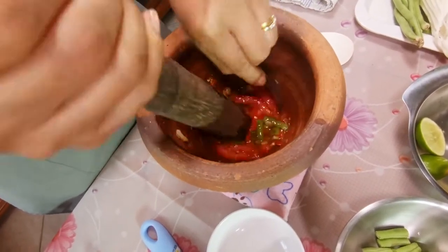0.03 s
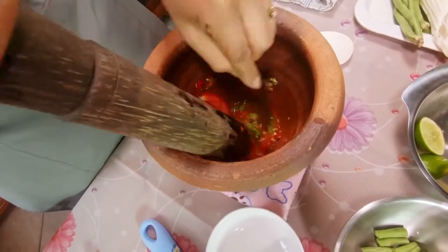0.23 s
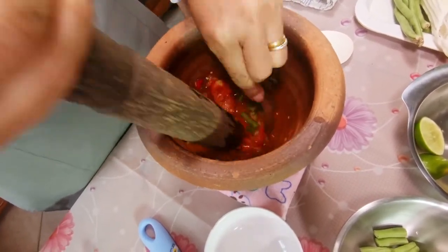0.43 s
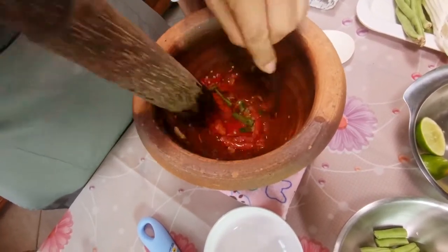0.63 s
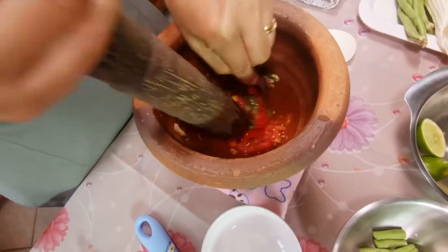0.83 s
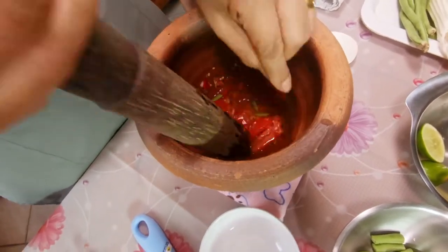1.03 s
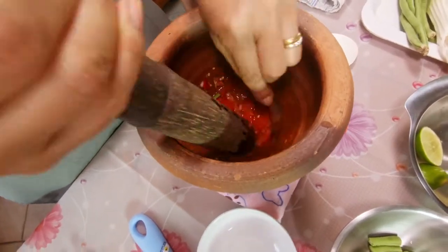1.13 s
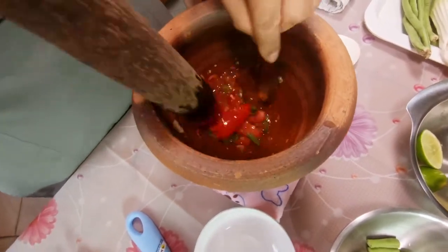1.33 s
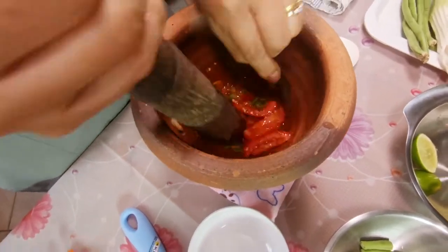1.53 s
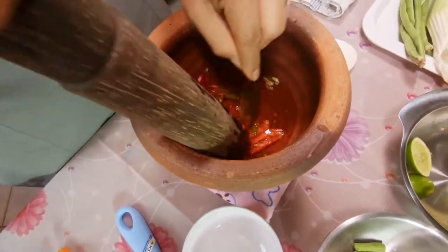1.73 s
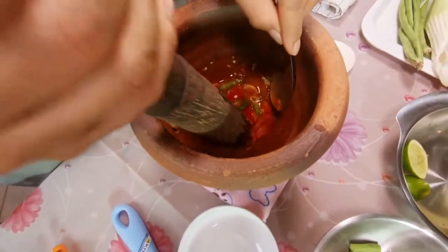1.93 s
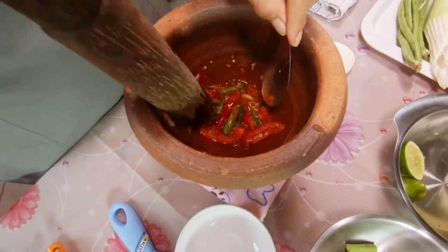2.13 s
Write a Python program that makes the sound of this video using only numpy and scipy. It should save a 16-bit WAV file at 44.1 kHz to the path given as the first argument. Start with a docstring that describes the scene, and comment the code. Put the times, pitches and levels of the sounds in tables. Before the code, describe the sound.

Hollow, uneven pestle knocks in a clay mortar, with a spoon rasping and clinking between them.

```python
"""A wooden pestle pounds wet chilli paste in a clay mortar while a metal spoon scrapes it off the wall.
The ring of a blow dies away, and the spoon rasps by stick-slip friction, catching, squeaking and clinking.
Ten more uneven blows excite the modes of the hollow and the clay, while bubbles burst in the paste.
Near two seconds the work stops and the crackle sinks. Throughout, a small kitchen reverberates
and low rumble comes and goes on the close microphone."""
import sys
import numpy as np
from scipy import signal
from scipy.fft import rfft, irfft
from scipy.io import wavfile

SR = 44100
rng = np.random.default_rng(int(sys.argv[2]) if len(sys.argv) > 2 else 0)


def to_wav(s):
    """Save 16-bit WAV."""
    ch = np.atleast_2d(s).T  # columns
    pcm = np.round(np.clip(ch, -1, 1) * 32767)  # PCM
    wavfile.write(sys.argv[1], SR, pcm.astype(np.int16))


N = 97020

# spectrum of metal rasping on clay: frequency_hz, level_db
RASP_SPECTRUM = [(200, -50), (650, 4.5), (950, 1.5), (1450, -0.5), (2200, 0), (3200, -2), (4600, -6.5),
                 (6200, -5.5), (8000, -15.5), (12000, -23.5), (16000, -46)]
# modes of the spoon: pitch_hz
SPOON_MODES_HZ = [2085, 2200, 3880, 4060, 6120, 8790, 10930, 13060]
# the same modes, row for row: t60_s, level_db
SPOON_MODES = [(0.045, -3), (0.075, -4.5), (0.06, -7.5), (0.025, -6), (.025, -13), (.035, -23), (0.06, -22),
               (.05, -29)]

HOLLOW_HZ = 600.5  # the mortar's air cavity, as the spoon excites it
LN_1000 = np.log(1000)  # a decay of 60 dB, in nepers


def pestle():
    """Impact excites the damped modes of mortar and table; returns the direct sound and the room feed."""
    # modes of the hollow, then the clay wall, last the foot: pitch_hz, t60_s, level_db, room_send_db
    mortar_modes = [(578.6, 0.045, 9, -15.5), (767, 0.0061, -20.5, -19.5), (953, 0.008, 7, -7),
                    (1293, 0.012, 6.5, -9.5), (1521.8, 0.12, 5, -6.5), (1636, 0.039, 7.5, -9.5),
                    (2020, 0.049, -22, -26), (2371, 0.034, -11, -15), (3260, 0.027, -16.5, -20.5),
                    (3937, 0.036, 3, -17.5), (405, 0.03, -12, -6.5)]
    # registers whose levels depend on the spot struck: centre_hz
    registers_hz = [400, 600, 960, 1290, 1535, 1645, 2400, 3170, 3950]
    # blows: start_s, nine columns of register_db, unused_db, rim_lag_ms
    blows = [(-.03, -24, 12.5, -22, -22, -9, -9, -34, -50, -46, -54, -0.2),
             (0.3027, -8.5, -12, -13.5, -37, -30, -36, -30, -56, -29.5, -29, 0.18),
             (0.6638, -15.5, -12.5, -12, -15.5, -11, -53, -15, -39, -27, -51, -0.11),
             (0.7227, -2, -8.5, -36.5, -3.5, -19.5, -1.5, 2, -30, -39, -32, 0.092),
             (0.9837, -2, -14, -5.5, -24.5, -8, -17, -4, -42, -16.5, -30, 0.13),
             (1.0991, -21, -26.5, -49, -51, -51, -46.5, -23, -48, -58, -58, -0.18),
             (1.3615, -10, -24.5, -16.5, -59, -32.5, -29, -25, -43, -30.5, -53, 0.056),
             (1.4916, -11, -14, -25, -12, -31, -15, -10.5, -9, -30, -64, -0.082),
             (1.6503, 0, -13, -6, -35, -16.5, -39, 3.5, 2, -17, -37, 0.12),
             (1.7685, -10, -15, -16.5, -24, -31, -32.5, -17, -60, -33, -33.5, -0.1),
             (1.854, -26, -28.5, -41, -39, -41, -44, -24, -60, -64, -44, -0.017)]
    hollow_mode, rim_modes, positive_modes = 0, (4, 5), (0, 3, 5, 7, 10)
    direct, to_room = np.zeros((2, N)), np.zeros((2, N))
    for start, *register_db, _, rim_lag_ms in blows:
        for k, (hz, t60, db, send_db) in enumerate(mortar_modes):
            lag_ms = rim_lag_ms if k in rim_modes else 0.0036
            bend_hz = 65 if k == hollow_mode else 0  # the hollow starts sharp
            polarity = 1 if k in positive_modes else -1
            level = undb(db + np.interp(hz, registers_hz, register_db))
            mode = polarity * level * ring(hz, t60, lag_ms, bend_hz)
            add(direct, start, mode)
            add(to_room, start, mode * undb(send_db))
        table_thud = undb(register_db[0] - 25) * ring(hz=189, t60=0.096)
        add(direct, start, table_thud)
    wood = signal.butter(10, 4300, fs=SR, output="sos")  # the blunt head excites no high treble
    fade_in = np.minimum(clock() / .004, 1)
    return signal.sosfilt(wood, direct) * fade_in, signal.sosfilt(wood, to_room)


def spoon():
    """Friction of metal on clay is a train of tiny impulses, coloured by resonances."""
    # resonances of the rasp: centre_hz, width_hz, lift_db
    rasp_peaks = [(1750, 190, 5.5), (2030, 240, 5.5), (2766, 150, 7), (3820, 400, 9.5), (5610, 44, 9.5)]
    colour = gains(RASP_SPECTRUM) * np.prod([peak(*row) for row in rasp_peaks], axis=0)
    rasp = rfft(grit(colour))
    return strokes(rasp) + catches(rasp)


def strokes(rasp):
    """Stick-slip sliding drives the hollow and the spoon into resonance and smears the paste."""
    # strokes: start_s, stop_s, final_db, swell_db, hiss_db, hollow_db, ring_db, bite_hz
    slides = [(.01, 0.126, -20.5, 31, -31, -38.5, -39, 4616),
              (0.451, 0.528, -24, 46, -42.5, -44, -60, 6360),
              (0.703, 0.887, -19.5, 51.5, -35.5, -36.5, -42.5, 3060),
              (1.113, 1.171, -24, 51, -50, -46.5, -46, 3300),
              (1.461, 1.638, -29, 20, -35, -45.5, -64, 2240),
              (1.816, 1.951, -53, -5, -82, -43.5, -74.5, 3180)]
    # hiss of smeared paste: frequency_hz, level_db
    hiss_spectrum = [(500, -32.5), (3000, -39), (5000, -5.5), (6000, 4.5), (7200, -3), (10000, -8.5),
                     (13500, -15), (16000, -55)]
    attack_s, release_s, hiss_lead_s, hiss_width_s = .02, 0.0065, 0.037, 0.029
    t, out = clock(), np.zeros((2, N))
    # sliding excites the spoon's high modes less than a tap does
    metal_response = sum(undb(db / 2) / (1 + (hz / 5000) ** 2) * resonance(hz, LN_1000 / np.pi / t60)
                         for hz, (t60, db) in zip(SPOON_MODES_HZ, SPOON_MODES))
    cavity = resonance(HOLLOW_HZ, width_hz=64) * resonance(HOLLOW_HZ, width_hz=HOLLOW_HZ)
    hiss, metal, hollow = grit(gains(hiss_spectrum)), grit(metal_response), grit(cavity)
    slip = judder()
    bubbles = undb(-7) * pops()
    smear = judder()
    for start, stop, final_db, swell_db, hiss_db, hollow_db, ring_db, bite_hz in slides:
        contact = np.clip((t - start) / attack_s, 0, 1) * np.exp(-np.maximum(t - stop, 0) / release_s)
        swell = undb(final_db - swell_db * np.clip((stop - t) / (stop - start), 0, 1))
        scrape = slip * swell * (bite(rasp, bite_hz) + bubbles)
        hiss_level = smear * undb(hiss_db) / (1 + ((t - stop + hiss_lead_s) / hiss_width_s) ** 2)
        out += contact * (scrape + hiss_level * hiss + undb(hollow_db) * hollow + undb(ring_db) * metal)
    return out


def catches(rasp):
    """The spoon catches on the clay and rings; the shorter the rise, the more high modes it excites."""
    # catches: start_s, rise_s, decay_s, crunch_db, ring_db, hollow_db, bite_hz
    snags = [(.0145, 0.002, 0.011, -24.5, -37, -27.5, 1780), (.1266, 0.00033, .0012, -38, -26, -73, 4460),
             (.3825, 0.00025, 0.029, -36, -15, -48, 9040),
             (.4178, 0.00079, 0.0022, -24, -22.5, -28.5, 2250),
             (.457, 0.00087, 0.004, -34.5, -36, -56, 3820),
             (.5222, 0.00073, 0.0088, -15.5, -37.5, -10.5, 3114),
             (.5548, 0.00079, 0.0072, -17, -36, -25, 3040), (.5785, 0.00023, 0.0017, -27, -51, -80, 4800),
             (.7238, 0.000077, 0.0017, -9.5, -38, -27, 3370),
             (.7398, 0.0001, 0.0043, -15.5, -50.5, -51, 6770),
             (1.079, 0.0012, 0.023, -43.5, -69, -42.5, 2780),
             (1.146, 0.0015, 0.0034, -21.5, -18, -46.5, 2280),
             (1.161, 0.0058, 0.0073, -18.5, -20.5, -49.5, 2220),
             (1.168, 0.0059, 0.0029, -13.5, -19, -31.5, 3220),
             (1.199, 0.00033, 0.0026, -23.5, -45, -51, 2970),
             (1.442, 0.00026, 0.0013, -37, -58, -60.5, 2010),
             (1.4785, 0.0012, 0.0087, -27, -41.5, -45, 2670),
             (1.634, 0.0014, 0.0035, -22.5, -18.5, -23.5, 2680)]
    soft_cycles = 18  # a mode that swings this often during the rise rings at half amplitude
    t, out = clock(), np.zeros((2, N))
    modes = [(hz, undb(db) * ring(hz, t60, lag_ms=0.0036, bend_hz=-200))
             for hz, (t60, db) in zip(SPOON_MODES_HZ, SPOON_MODES)]
    chatter = judder(depth_db=5)  # the ringing spoon keeps brushing the clay
    knock = ring(HOLLOW_HZ, t60=0.061, bend_hz=216)  # starts sharp as the spoon digs into the paste
    for start, rise, decay, crunch_db, ring_db, hollow_db, bite_hz in snags:
        contact = np.clip((t - start) / rise, 0, 1) * np.exp(-np.maximum(t - start - rise, 0) / decay)
        out += undb(crunch_db) * contact * bite(rasp, bite_hz)
        clink = 0
        for hz, mode in modes:
            brushing = np.roll(chatter, rng.integers(N))[:mode.shape[1]]
            clink += mode * brushing / (1 + (hz * rise / soft_cycles) ** 2)
        add(out, start, undb(ring_db) * clink + undb(hollow_db) * knock)
    return out


def bite(rasp, hz):
    """Resonant filtering: the spot of contact favours one band of the rasp's spectrum."""
    band = resonance(hz, width_hz=1.5 * hz) * peak(hz, width_hz=84, lift_db=12.5)
    return unit(irfft(rasp * band, N))


def squeaks():
    """Stick-slip of the spoon's edge locks into rough notes that glide with the point of contact."""
    # squeaks: centre_s, width_s, level_db, pitch_hz, glide_octaves_per_s
    notes = [(0.086, .009, -24.5, 6050, 4), (.129, .0025, -16.5, 4420, -21), (0.3846, .002, -22, 1977, 6),
             (0.469, 0.0055, -33, 3750, -5.5), (1.152, .002, -17.5, 2130, 1.5),
             (1.173, .0045, -12, 2120, 3), (1.5647, .002, -24, 5830, -0.5), (1.616, .014, -30, 2324, 5)]
    t, out = clock(), np.zeros(N)
    for centre, width, db, hz, glide in notes:
        jitter = 1 + .045 * wander(per_s=1500)
        pitch = hz * 2 ** (glide * np.clip(t - centre, -2 * width, 2 * width)) * jitter
        out += undb(db) * gaussian(centre, width) * judder() * np.sin(2 * np.pi * np.cumsum(pitch) / SR)
    return out


def pops():
    """Tiny bubbles burst in the smeared paste, each a damped resonator of rising pitch."""
    per_s, median_hz, spread_octaves, quality, glide = 210, 3680, 0.53, 74, 0.14
    out, t = np.zeros((2, N)), np.arange(SR // 40) / SR
    for when, pitch, size, pan in rng.random((int(per_s * N / SR), 4)):
        octaves = spread_octaves * np.log((pitch + 1e-6) / (1 - pitch)) / 2
        hz = min(median_hz * 2 ** octaves, SR / 4)
        age = t * hz / quality
        note = np.sin(2 * np.pi * hz * t * (1 + glide * np.minimum(age, 1) / 2)) * np.exp(-np.pi * age)
        level = undb(1.5 * np.log(max(size, .02)))
        add(out, when * N / SR, level * note * np.sqrt([[1 + pan], [2 - pan]]))
    return unit(out)


def paste():
    """Shot noise: wet pulp crackles faintly while it is worked, then falls to a quarter amplitude."""
    worked = np.interp(clock(), [1.95, 1.979], [1, .25])
    return undb(-62) * worked * grit(gains(RASP_SPECTRUM), per_s=1100, spread_db=5.5)


def kitchen(sound):
    """Reverberation: a diffuse tail whose treble dies sooner and whose bass is alike on both sides."""
    # stereo width of the tail: frequency_hz, side_over_mid_db
    room_width = [(100, -14), (600, -7), (1500, -1.5), (16000, -5)]
    low_t60_s, high_t60_s, crossover_hz, delay_s = 0.57, 0.42, 3000, 0.0017
    t, side = clock(), gains(room_width)
    noise = spread(rng.standard_normal((2, N)), 1 / np.hypot(1, side), side)
    low = signal.sosfilt(signal.butter(2, crossover_hz, fs=SR, output="sos"), noise)
    tail = low * np.exp(-LN_1000 * t / low_t60_s) + (noise - low) * np.exp(-LN_1000 * t / high_t60_s)
    tail = unit(tail * (t > delay_s)) / np.sqrt(N)
    return signal.fftconvolve(sound, tail, axes=1)[:, :N]


def rumble():
    """Amplitude-modulated low noise swells on the microphone as the arms move."""
    # swells: centre_s, width_s, level_db
    swells = [(0.012, .02, -37), (.43, 0.044, -46), (0.679, 0.023, -35.5), (0.744, 0.01, -18.5),
              (.79, 0.028, -33), (0.973, 0.02, -38.5), (1.045, 0.065, -32), (1.2, 0.057, -40),
              (1.86, 0.02, -32.5)]
    # spectrum of the rumble: frequency_hz, level_db
    spectrum = [(15, -11), (35, 8), (60, -4), (135, -2), (200, -17), (400, -31), (1500, -82)]
    envelope = sum(undb(db) * gaussian(centre, width) for centre, width, db in swells)
    return envelope * spread(rng.standard_normal((2, N)), gains(spectrum), side=undb(-8.5))


def air():
    """Stationary noise, strongest in the bass, forms the room's noise floor."""
    # spectrum of the background: frequency_hz, level_db
    spectrum = [(15, -40.5), (25, -6.5), (70, -22), (200, -6), (300, -25.5), (439, -24), (911, -31),
                (1160, -28), (7510, -50), (9570, -52), (16000, -70)]
    return undb(-49.5) * spread(rng.standard_normal((2, N)), gains(spectrum), side=undb(-10.5))


def ring(hz, t60, lag_ms=0, bend_hz=0):
    """Free decay of a struck mode, bent in pitch at contact; the right channel trails by lag_ms."""
    settle_s, push_s = 0.0037, 0.00067
    t = np.maximum(np.arange(SR // 4) / SR - np.array([[-lag_ms], [lag_ms]]) / 2000, 0)
    cycles = hz * t + bend_hz * settle_s * (1 - np.exp(-t / settle_s))
    build_s = push_s + 0.34 / hz + 0.01 * t60  # low and lightly damped modes build up more slowly
    onset = 1 - np.exp(-(t / build_s) ** 2)
    return onset * np.sin(2 * np.pi * cycles) * np.exp(-LN_1000 * t / t60)


def grit(response, per_s=5000, spread_db=2.4):
    """Shot noise: random clicks of unequal size pass through a frequency response."""
    # stereo width of the grains: frequency_hz, side_over_mid_db
    grain_width = [(100, -9.5), (600, -11), (2000, -10.5), (5000, -13.5), (8000, 2.5), (16000, -1.5)]
    clicks = (rng.random((2, N)) < per_s / SR) * rng.choice([-1, 1], (2, N))
    sizes = undb(spread_db * np.minimum(rng.exponential(size=(2, N)), 5))
    return spread(clicks * sizes, response, gains(grain_width))


def judder(depth_db=2.5):
    """Uneven sticking and slipping modulates the amplitude."""
    return unit(undb(depth_db * wander(per_s=320)))


def wander(per_s):
    """Random values joined by straight lines."""
    return np.interp(clock() * per_s, np.arange(N), rng.standard_normal(N))


def spread(pair, response, side):
    """Mid-side stereo from two uncorrelated signals, filtered by one response."""
    spectra = rfft(pair) * response
    mid, difference = irfft(spectra[0], N), irfft(spectra[1] * side, N)
    return unit(np.array([mid + difference, mid - difference]))


def resonance(hz, width_hz):
    """Complex response of a damped oscillator, 1 at its centre."""
    f = bins_hz()
    return 1 / (1 + 1j * (f - hz ** 2 / f) / width_hz)


def peak(hz, width_hz, lift_db):
    """A flat response lifted by one resonance."""
    return 1 + (undb(lift_db) - 1) * resonance(hz, width_hz)


def gains(points):
    """Gain at each frequency bin from (frequency_hz, level_db) points."""
    hz, db = np.array(points, float).T
    return undb(np.interp(np.log(bins_hz()), np.log(hz), db))


def add(out, start_s, sound):
    """Superpose a sound, trimming what falls outside the scene."""
    i = int(start_s * SR)
    sound, i = sound[:, max(-i, 0):], max(i, 0)
    out[:, i:i + sound.shape[1]] += sound[:, :N - i]


def gaussian(centre_s, width_s):
    return np.exp(-((clock() - centre_s) / width_s) ** 2 / 2)


def bins_hz():
    return np.arange(N // 2 + 1) * SR / N + 1


def clock():
    return np.arange(N) / SR


def undb(db):
    return 10 ** (np.asarray(db) / 20)


def unit(x):
    return x / np.sqrt(np.mean(x ** 2))


def scene():
    """Superposition of direct sound, reverberation and background."""
    knocks, to_room = pestle()
    stirring = spoon() + squeaks() + paste()
    return knocks + stirring + air() + kitchen(to_room + undb(-15.5) * stirring) + rumble()


def record(dry):
    """Hard clipping limits the strongest peaks; a low-pass cuts the top above 16 kHz."""
    clipped = np.clip(dry * undb(-2.5), -1, 1)
    return signal.sosfilt(signal.ellip(8, .2, 70, 16000, fs=SR, output="sos"), clipped)


dry = scene()
out = record(dry)
to_wav(out)
```